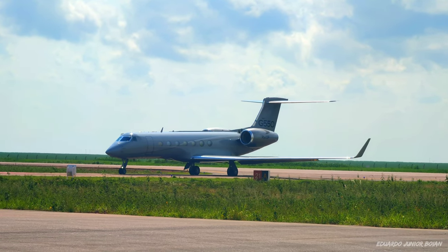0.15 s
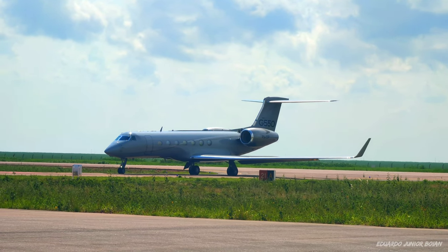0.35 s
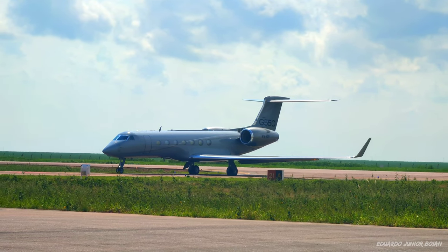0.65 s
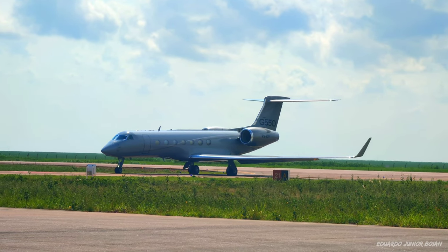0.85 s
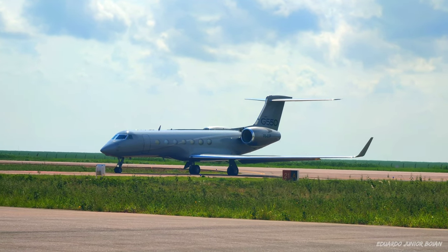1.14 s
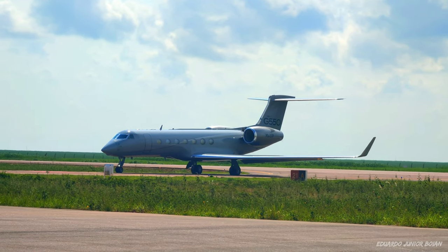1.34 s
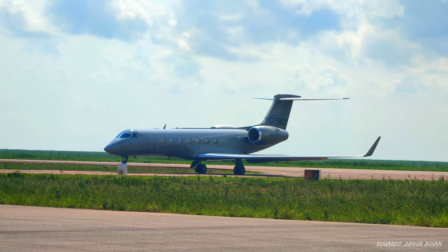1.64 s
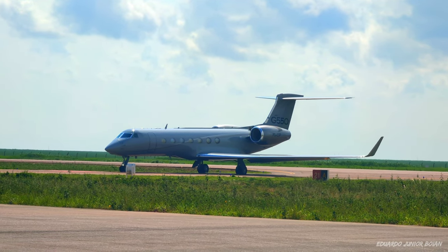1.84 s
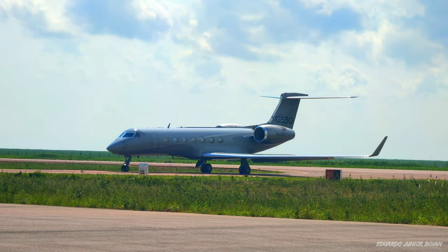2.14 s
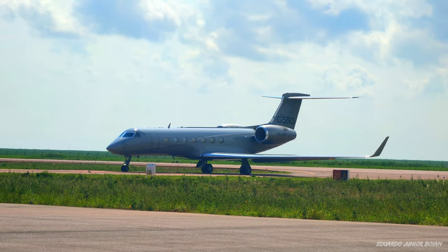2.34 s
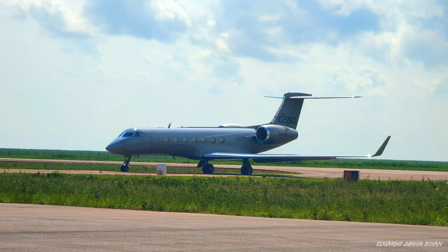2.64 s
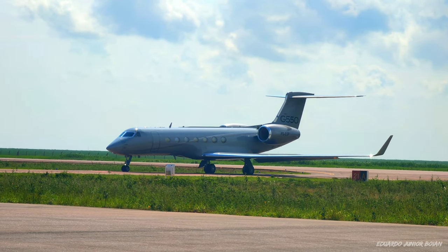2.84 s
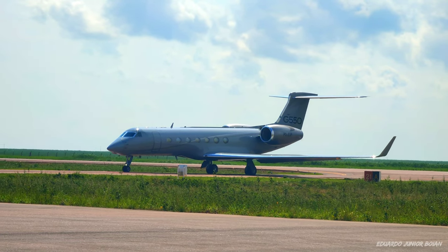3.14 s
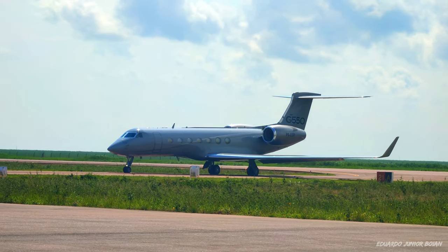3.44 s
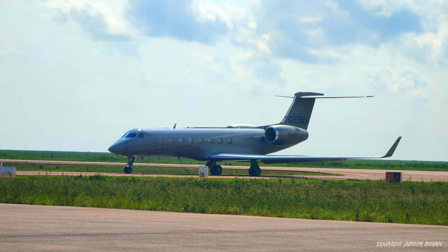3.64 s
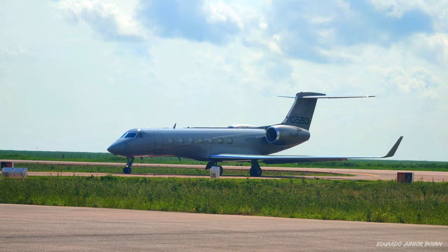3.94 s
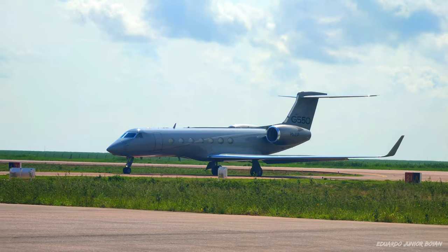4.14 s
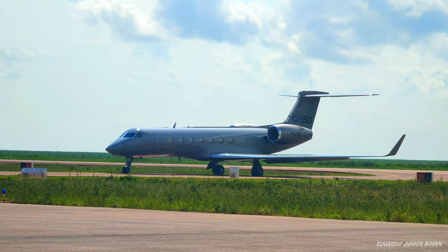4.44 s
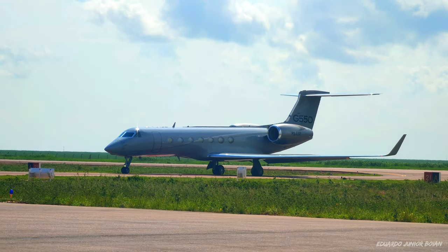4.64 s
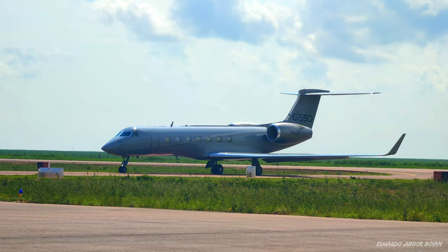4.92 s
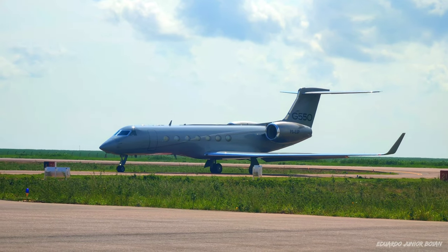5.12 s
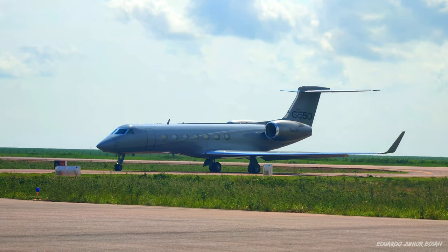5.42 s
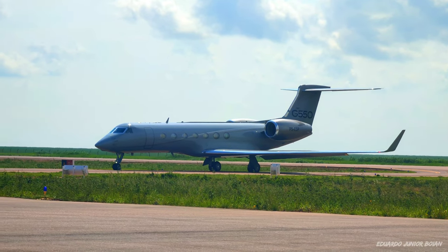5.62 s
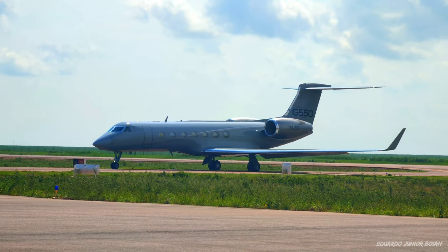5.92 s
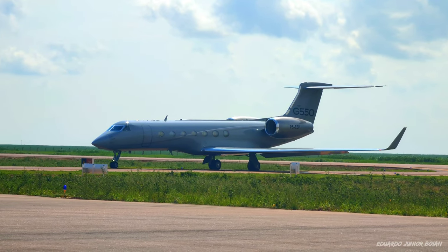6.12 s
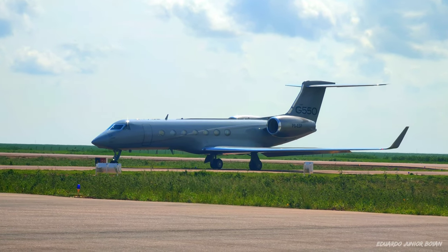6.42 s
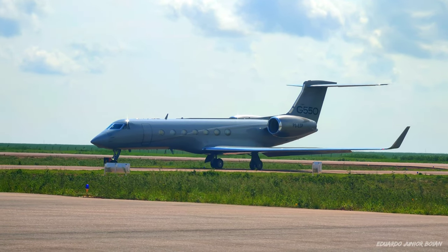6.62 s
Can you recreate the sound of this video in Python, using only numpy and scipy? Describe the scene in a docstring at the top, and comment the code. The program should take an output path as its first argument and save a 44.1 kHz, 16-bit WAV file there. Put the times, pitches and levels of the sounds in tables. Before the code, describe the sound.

A twin-engine jet taxis some way off with a steady airy roar, low hum and thin whines, while wind rumbles and buffets the microphone, hardest on the right.

```python
"""Open ground: a twin-turbofan jet taxis some way off, heard through two microphone ports, left and right.
The engines are a broad roar (coloured noise), a low hum and thin whines (sine tones), all wavering with the air.
Wind rumbles on both ports (low, lumpy noise) and buffets the right one hard (short bursts of low noise).
The biggest buffets make that channel's limiter turn it down."""
import sys
import numpy as np
from scipy import signal
from scipy.fft import rfft, irfft, next_fast_len
from scipy.io import wavfile
from scipy.ndimage import uniform_filter1d, minimum_filter1d

SR = 44100
rng = np.random.default_rng(int(sys.argv[2]) if len(sys.argv) > 2 else 0)


def dump(signal):
    """Clip the signal to [-1, 1] and save it as 16-bit WAV at the path in sys.argv[1]."""
    limited = np.clip(np.atleast_2d(signal).T, -1, 1)
    pcm = np.round(limited * 32767).astype(np.int16)
    wavfile.write(sys.argv[1], SR, pcm)


N = 298557  # length in samples

# How the engine roar changes. Each row: time in seconds, relative level in dB, treble tilt in dB per octave.
ENGINE_CURVE = [(0.0, -42.5, 0.5), (0.66, -41.5, 1.5), (2.75, -42.5, 1), (3.79, -43, 0.5),
                (5.17, -41, -0.5), (5.45, -42, -0.5), (6.3, -41, 0.1), (6.54, -41, 2.5), (6.77, -39.5, 1.5)]
# Colour of the roar at each port. Each row: frequency in Hz, relative level in dB per Hz.
ROAR_COLOUR_LEFT = [(300, 0.8), (650, -7.2), (2050, -10.7), (2300, -6.5), (3300, -7.9), (4200, -12.2),
                    (4650, -8.3), (5100, -10.5), (5500, -8.0), (6400, -10.7), (7200, -15.7), (8200, -16.8),
                    (11000, -27.5), (12800, -29.6), (15600, -39.4)]
ROAR_COLOUR_RIGHT = [(300, -1.3), (650, -9.1), (1400, -10.1), (1900, -10.7), (2400, -5.7), (3800, -8.1),
                     (4200, -11.5), (6000, -16.1), (7200, -15.6), (7900, -14.2), (9000, -22.3),
                     (11000, -31.8), (12800, -33.3), (15600, -41.3)]
# Bands of the roar that swell for a while. Each row: centre in Hz, width in Hz, glide in Hz per second,
# middle in seconds, length in seconds, left boost in dB, right boost in dB.
ROAR_SWELLS = [(1040, 450, 8, 0.87, 1.7, 9.5, 4), (1820, 410, -100, 1.1, 1.4, 9, 2),
               (8000, 710, 4, .33, 0.68, 5, 4.5), (8000, 1500, 0, 1.6, 1.1, 5.5, 2.5),
               (2273, 150, 150, 1.92, 0.93, 7.5, 6), (2545, 370, 200, 2.18, 0.97, 7.5, 5.5),
               (875, 250, 18, 4.03, 2.6, 9, 6.5), (1220, 190, -52, 4.69, 1.94, 12.5, 2),
               (2580, 72, -1, 5.2, 0.4, 9, 12), (1630, 490, 16, 5.3, 8.8, 4.5, 3),
               (3300, 870, -2, 6.16, 1.1, 2, 1.5), (820, 44, 4, 6.3, 1.3, 15.5, 8),
               (4700, 250, 0, 0.92, 0.47, 1, 5)]
# How alike the roar is at the two ports. Each row: frequency in Hz, likeness from 0 to 1, phase between in radians.
PORT_LIKENESS = [(300, .8, 0), (900, .65, 0), (1300, .5, .5), (1500, .15, -.5), (2400, .6, .8),
                 (2900, .1, .5), (3400, .5, 1.2), (4000, .25, -1.8), (4700, .4, -.3), (6200, .33, .8),
                 (6800, .1, 2), (7800, .25, .8), (9900, .3, 1.5), (15000, .08, -3)]
# Speed of the engine core, which every tone follows. Each row: time in seconds, parts per thousand off the mean.
SPOOL_SPEED = [(0, 1.2), (.3, 1), (.75, -1.2), (1.55, -2.2), (2.5, -.4), (3.4, -.2), (4.3, 1.5), (5.8, 1.1),
               (6.77, -1.1)]
# The two strongest whines at the left port. Each row: time in seconds, lower whine in dB, upper whine in dB.
WHINE_LEVELS = [(0, -60, -55), (.4, -59, -60), (.55, -54, -59), (.8, -54, -57), (1.1, -55, -57),
                (1.35, -61, -56), (1.62, -53, -57), (1.95, -61, -51), (2.35, -59, -61), (2.7, -54, -56),
                (2.95, -58, -62), (3.2, -62, -58), (3.35, -61, -51), (3.82, -59, -50), (4.1, -62, -57),
                (4.6, -52, -57), (5.05, -56, -54), (5.3, -60, -60), (5.8, -61, -55), (6.1, -58, -61),
                (6.35, -56, -58), (6.55, -51, -50), (6.77, -52, -51)]
# Mean pitch of those whines, lower then upper, in Hz.
WHINE_PITCHES = (5375, 6133)
# Level of each whine at the right port compared with the left, in dB.
WHINE_RIGHT_OFFSETS = (-4, -7)
# Pitches of the other tones; the first two are the shaft hums of the two engines.
# Each row: mean pitch in Hz, wander in Hz.
TONE_PITCHES = [(162, 6), (175, 6), (2568, 15), (4617, 6), (6590, 10), (6893, 8), (7344, 10), (8100, 15),
                (10750, 10), (11502, 10), (11976, 12), (12275, 12), (12729, 15), (13489, 15)]
# Levels of those tones, in the same order. Each row: left level in dB, right level in dB.
TONE_LEVELS = [(-36.5, -34.5), (-37, -37), (-83, -55), (-64, -62), (-63, -66), (-78, -81), (-71, -70),
               (-81, -62), (-80, -89), (-95, -92), (-82, -89), (-84, -86), (-87, -87), (-99, -94)]
# How the wind rumble rises and falls. Each row: time in seconds, left level in dB, right level in dB.
GUST_CURVE = [(0, -25.5, -22), (.3, -19, -23), (.5, -24, -21.5), (.63, -25, -14), (.8, -25.5, -28.5),
              (1.0, -25.5, -33), (1.14, -25.5, -16), (1.3, -29.5, -28), (1.45, -20.5, -21),
              (1.7, -28, -29.5), (2.1, -27, -42), (2.32, -24.5, -22.5), (2.65, -24.5, -33.5),
              (3.0, -25, -20.5), (3.35, -28.5, -35), (3.8, -28.5, -21), (3.95, -30, -25.5),
              (4.12, -26, -20.5), (4.4, -32.5, -28.5), (4.8, -29, -35), (5.3, -32, -38), (5.5, -30, -24),
              (5.72, -32, -37), (5.88, -25, -17), (6.0, -32, -22), (6.2, -22.5, -16.5), (6.4, -24, -21),
              (6.55, -21, -23.5), (6.77, -22.5, -21.5)]
# Spectrum shape of the rumble. Each row: frequency in Hz, left and right relative levels in dB per Hz.
RUMBLE_COLOUR = [(15, -24, -15.5), (30, -17, -2.5), (60.7, -3.5, 0.5), (84, -0.5, 3), (152.5, -5, -8),
                 (264, -13.5, -18), (422, -24, -21), (620, -33, -35), (1490, -92, -66), (4000, -110, -110)]
# The strongest buffets. Each row: middle in seconds, port (0 left, 1 right), peak in dB, length in milliseconds.
STRONG_BUFFETS = [(0.141, 0, -13.5, 5.5), (0.145, 1, -4.5, 15), (0.21, 1, -13.5, 27), (0.368, 1, 0, 8.4),
                  (0.503, 1, -15, 9.3), (0.554, 1, -6, 13), (0.601, 1, -28, 15), (0.695, 1, -5, 13),
                  (0.843, 1, -15, 29), (0.868, 0, -12, 9.8), (0.88, 1, -8, 6.7), (0.965, 1, -15, 20),
                  (1.143, 1, -10.5, 17), (1.396, 1, -13, 14), (1.443, 1, -13.5, 9.7), (1.497, 1, -5.5, 9.9),
                  (1.592, 1, -6.5, 6.9), (2.164, 0, -14.5, 4.9), (2.523, 1, -12.5, 23), (2.863, 1, -9, 8.1),
                  (2.989, 1, -8.5, 17), (3.015, 1, -6.5, 13), (3.806, 1, -10.5, 15), (3.837, 1, -7.5, 4.7),
                  (3.866, 1, -12, 30), (3.968, 1, -17, 11), (4.013, 1, -6.5, 13), (4.029, 1, -1.5, 3.9),
                  (4.097, 1, -0.5, 13.5), (4.121, 1, -4.5, 59), (4.152, 1, -24, 19), (4.222, 1, -11, 54),
                  (5.57, 1, -8.5, 20), (5.601, 1, -14, 30), (5.828, 1, -9, 9), (5.85, 1, -2.5, 18),
                  (5.889, 1, -6, 16), (5.93, 1, -8, 3.1), (5.997, 1, -0.5, 5.2), (6.034, 1, -8.5, 14),
                  (6.1, 1, -6, 24), (6.141, 1, -4.5, 9.4), (6.172, 1, -20, 10), (6.282, 1, 2, 14.5),
                  (6.31, 1, -0.5, 9.7), (6.358, 1, -3, 7.1), (6.46, 1, -13, 20), (6.488, 1, -10, 19),
                  (6.675, 1, -12.5, 12.3)]

# Harder buffets are brighter: low-pass edge for a 0 dB peak (Hz), and its change per dB of peak (Hz).
BRIGHT_HZ, BRIGHT_HZ_PER_DB = 381, 9.5
# Small buffets: how many a second over both ports, peak over the gust level and its spread (dB), mean length (ms).
SMALL_PER_S, SMALL_OVER_DB, SMALL_SPREAD_DB, SMALL_MS = 6, 6.5, 3, 12.5
# Limiter: highest level (dB), hold (seconds), recovery (dB per second). Then the top cut (Hz).
LIMIT_DB, HOLD_S, RELEASE_DB_S = -.9, .06, 70
CUTOFF_HZ = 15800


def from_db(db):
    """Turn decibels into gain."""
    return 10 ** (np.asarray(db) / 20)


def rms_one(x):
    """Scale each row to an rms (average strength) of 1."""
    return x / np.sqrt(np.mean(x ** 2, axis=-1, keepdims=True) + 1e-20)


def in_time(rows):
    """Draw straight lines between the rows of a time table, giving one value a sample for each column."""
    seconds, *columns = np.transpose(rows)
    return np.array([np.interp(np.arange(N) / SR, seconds, column) for column in columns])


def at_hz(points, hz, axis=1):
    """Read one column of a spectrum table along a log-frequency axis."""
    points = np.array(points)
    return np.interp(np.log(hz + 1), np.log(points[:, 0]), points[:, axis])


def drift(rate_hz, count=2):
    """Slow random wavering of rms 1: noise smoothed twice by a one-pole low-pass at the given rate."""
    # One value per 40 samples; the first 2000 let the filter settle.
    pole = np.exp(-80 * np.pi * rate_hz / SR)
    noise = rng.standard_normal((count, N // 40 + 2002))
    slow = rms_one(signal.lfilter([1], [1, -2 * pole, pole * pole], noise)[:, 2000:])
    return np.array([np.interp(np.arange(N) / 40, np.arange(len(row)), row) for row in slow])


def roar(level_db, tilt_db, patchy_db, flicker_db):
    """Jet and fan noise: coloured per port, swelling in bands, patchy as eddies cross the sound path."""
    hop = 256
    stft_sizes = dict(nperseg=4 * hop, noverlap=3 * hop)
    hz, seconds, (mid, side) = signal.stft(rng.standard_normal((2, N)), SR, **stft_sizes)
    alike = at_hz(PORT_LIKENESS, hz)[:, None]
    port_phase = at_hz(PORT_LIKENESS, hz, axis=2)
    frames = np.minimum(np.arange(len(seconds)) * hop, N - 1)

    # The tilt turns about 4 kHz and stays flat below 2 kHz.
    octaves = np.log2(np.maximum(hz, 2000) / 4000)[:, None]
    wavering_db = level_db + 0.28 * drift(3.7, count=1)[0]
    common_db = wavering_db[frames] + tilt_db[frames] * octaves

    # 36 bands waver separately; gains in between are blended from the two nearest bands.
    knots = np.geomspace(100, 16000, num=36)
    place = np.interp(hz, knots, np.arange(len(knots)))
    below = np.minimum(place.astype(int), 34)
    blend = (place - below)[:, None]
    patches = patchy_db * drift(0.99, count=72) + flicker_db * drift(30.0, count=72)

    ports = []
    for port, colour in enumerate((ROAR_COLOUR_LEFT, ROAR_COLOUR_RIGHT)):
        # The left port's patchiness is the common part, made stronger; the right port shares part of it and
        # adds its own.
        own = patches[36 * port:36 * port + 36]
        band_db = (.6 * patches[:36] + .8 * own)[:, frames]
        gain_db = band_db[below] + blend * (band_db[below + 1] - band_db[below])
        gain_db += common_db + at_hz(colour, hz)[:, None]
        for centre_hz, width_hz, glide, middle, length, *swell_db in ROAR_SWELLS:
            off_hz = hz[:, None] - centre_hz - glide * (seconds - middle)
            off_s = seconds - middle
            gain_db += swell_db[port] * np.exp(-(2 * off_hz / width_hz) ** 2 - (2 * off_s / length) ** 2)
        sign = 1 - 2 * port
        sound = np.sqrt(1 + alike) * mid + sign * np.sqrt(1 - alike) * side
        sound *= np.exp(1j * port * port_phase)[:, None]
        ports.append(signal.istft(sound * from_db(gain_db), SR, **stft_sizes)[1][:N])
    return np.array(ports) * from_db(12)


def tone(hz, speed, wander_hz, fading_db):
    """A spool tone of rms 1: it wavers and fades in the turbulent air, a little apart at each port."""
    wander, = drift(5.935, count=1)
    phase = 2 * np.pi * np.cumsum(hz * speed + wander_hz * wander) / SR
    fading = from_db(fading_db * drift(3.1))
    return rms_one(fading * np.sin(phase + 0.61 * drift(3.3)))


def whines():
    """Shaft hums and compressor whines: tones whose pitches all follow the core speed."""
    out = np.zeros((2, N))
    speed = 1 + in_time(SPOOL_SPEED)[0] / 1000
    for hz, left_db, right_offset_db in zip(WHINE_PITCHES, in_time(WHINE_LEVELS), WHINE_RIGHT_OFFSETS):
        level_db = left_db + np.array([[0], [right_offset_db]])
        out += from_db(level_db) * tone(hz, speed, wander_hz=1.5, fading_db=1.5)
    for (hz, wander_hz), level_db in zip(TONE_PITCHES, TONE_LEVELS):
        out += from_db(level_db)[:, None] * tone(hz, speed, wander_hz, fading_db=4.0)
    return out


def rumble(gust_db, lumpy_db, flutter_db, brighten):
    """Wind eddies on each port: low lumpy noise; its upper part flutters more and grows faster than the gust."""
    size = next_fast_len(N)
    hz = np.fft.rfftfreq(size, 1 / SR)
    colour_db = [at_hz(RUMBLE_COLOUR, hz), at_hz(RUMBLE_COLOUR, hz, axis=2)]
    spectrum = rfft(rng.standard_normal((2, size))) * from_db(colour_db)
    noise = rms_one(irfft(spectrum, size)[:, :N])
    lumps = drift(17.7)
    upper = signal.sosfilt(signal.butter(2, 230, "high", fs=SR, output="sos"), noise)
    lower = noise - upper
    flutter = .5 * lumps + drift(34.0)
    rise_db = brighten * (gust_db + 16.5) + flutter_db * flutter
    return from_db(gust_db + lumpy_db * lumps) * (lower + from_db(rise_db) * upper)


def small_buffets(gust_db):
    """Pick lesser eddies at random moments, with peaks that follow the gust on their port just then."""
    draws = rng.random((int(SMALL_PER_S * N / SR), 4))
    seconds = .06 + draws[:, 0] * (N / SR - .07)
    port = (draws[:, 1] > .5).astype(int)
    gust_then_db = gust_db[port, (seconds * SR).astype(int)]
    peak_db = gust_then_db + SMALL_OVER_DB + SMALL_SPREAD_DB * (2 * draws[:, 2] - 1)
    length_ms = SMALL_MS * (.5 + draws[:, 3])
    return list(zip(seconds, port, peak_db, length_ms))


def buffets(events, floor_hz, edge_hz, top_hz, edge_db, edge_share):
    """Each eddy is a few uneven cycles on one port, with a shorter, brighter flap at its middle."""
    half = 2048  # half a burst, in samples
    out = np.zeros((2, N + 2 * half))
    t = np.arange(-half, half) / SR
    noise = rng.standard_normal((len(events), 4 * half))
    body = signal.sosfilt(signal.butter(2, floor_hz, "high", fs=SR, output="sos"), noise)
    edge = signal.sosfilt(signal.butter(2, edge_hz, "high", fs=SR, output="sos"), noise)
    edge = signal.sosfilt(signal.butter(4, top_hz, fs=SR, output="sos"), edge)
    for (seconds, port, peak_db, length_ms), low, high in zip(events, body, edge):
        # A bell shape; its length is its width at half height.
        shape = np.exp(-np.log(2) * (2000 * t / length_ms) ** 2)
        bright_hz = max(BRIGHT_HZ + BRIGHT_HZ_PER_DB * peak_db, 150)
        low = signal.sosfilt(signal.butter(4, bright_hz, fs=SR, output="sos"), low)
        # Only the second half is kept, once the filters have settled.
        low = low[2 * half:] * shape
        high = high[2 * half:] * shape ** (1 / edge_share ** 2)
        burst = low / np.abs(low).max() + from_db(edge_db) * high / np.abs(high).max()
        start = int(seconds * SR) - half
        out[int(port > .5), start:start + 2 * half] += from_db(peak_db) * burst / np.abs(burst).max()
    return out[:, :N]


def scene():
    """Add the far engines and the wind on the two ports."""
    level_db, tilt_db = in_time(ENGINE_CURVE)
    gust_db = in_time(GUST_CURVE)
    engines = roar(level_db, tilt_db, patchy_db=1.0, flicker_db=0.86) + whines()
    wind = rumble(gust_db, lumpy_db=4.0, flutter_db=3.0, brighten=0.28)
    eddies = STRONG_BUFFETS + small_buffets(gust_db)
    bursts = buffets(eddies, floor_hz=85, edge_hz=300, top_hz=500, edge_db=-8, edge_share=.5)
    return engines + wind + bursts


def record(dry):
    """A look-ahead limiter on each channel holds its gain down a moment, then recovers; the top is cut."""
    over_db = np.maximum(20 * np.log10(np.abs(dry) + 1e-9) - LIMIT_DB, 0)
    hold, ahead = int(HOLD_S * SR), 200  # samples
    # A minimum filter on the negative gives the running maximum.
    held_db = -minimum_filter1d(-over_db, size=hold + 2 * ahead, origin=hold // 2 - 1)
    # Adding and removing a ramp makes the cut fade at a steady rate.
    ramp = RELEASE_DB_S * np.arange(N) / SR
    cut_db = np.maximum.accumulate(held_db + ramp, axis=1) - ramp
    limited = dry * from_db(-uniform_filter1d(cut_db, size=ahead))
    return signal.sosfilt(signal.cheby2(22, 60, CUTOFF_HZ, fs=SR, output="sos"), limited)


dry = scene()
out = record(dry)
dump(out)
```